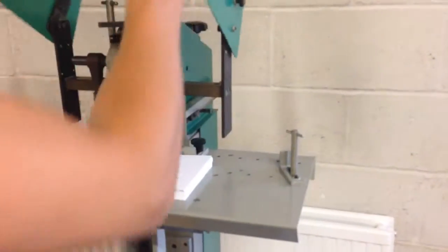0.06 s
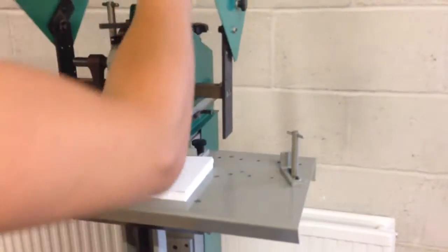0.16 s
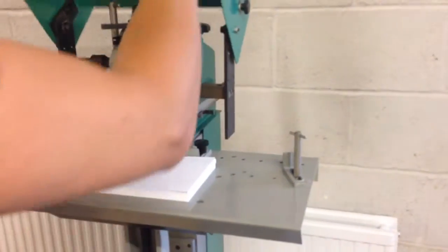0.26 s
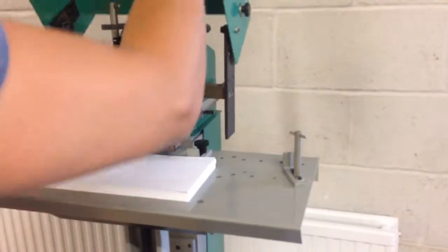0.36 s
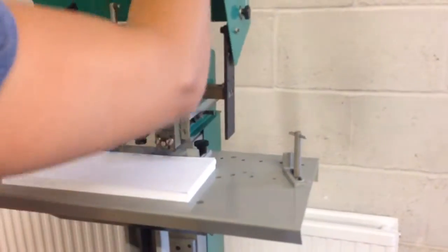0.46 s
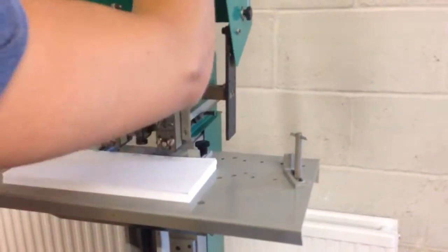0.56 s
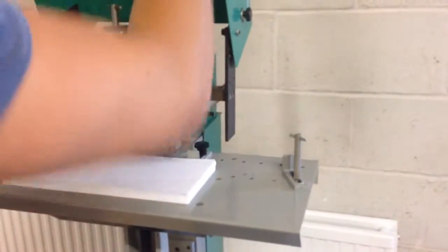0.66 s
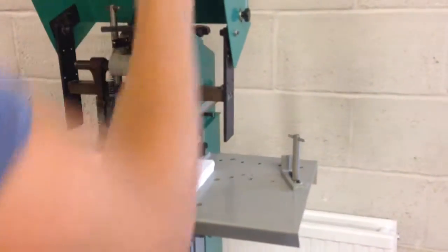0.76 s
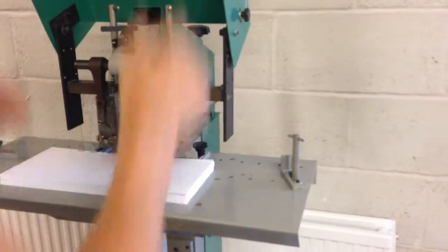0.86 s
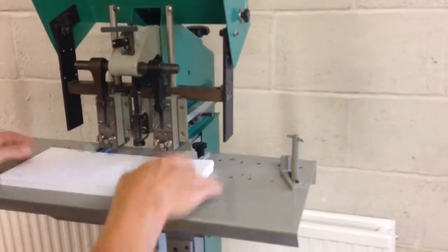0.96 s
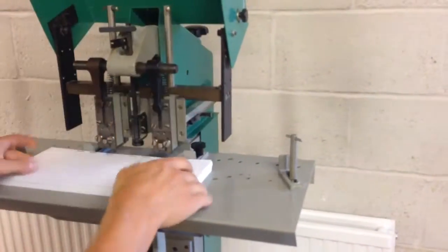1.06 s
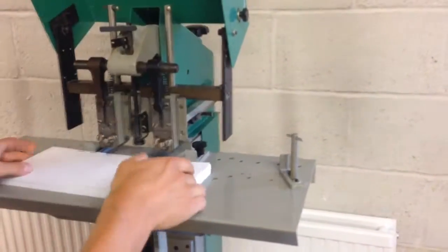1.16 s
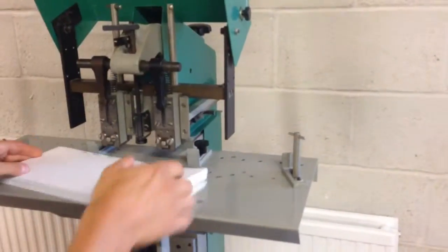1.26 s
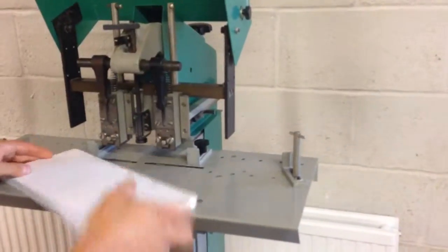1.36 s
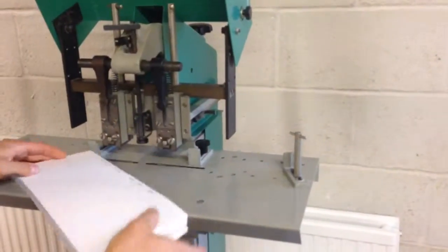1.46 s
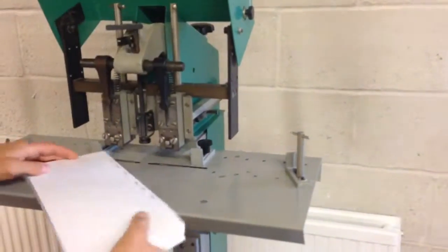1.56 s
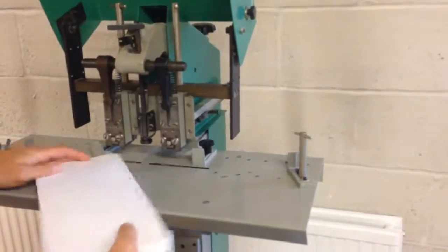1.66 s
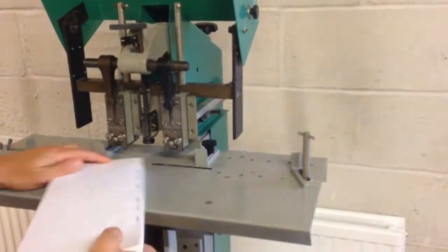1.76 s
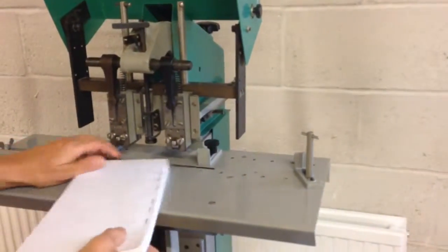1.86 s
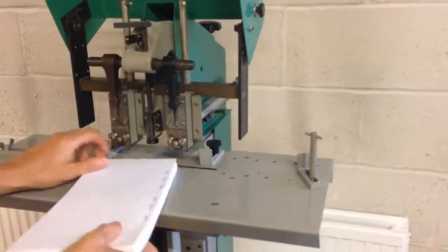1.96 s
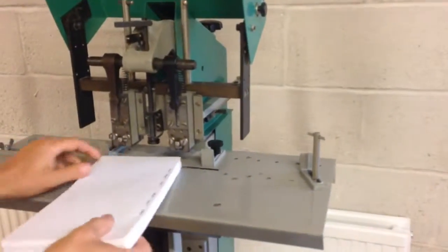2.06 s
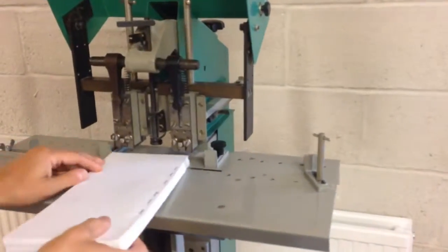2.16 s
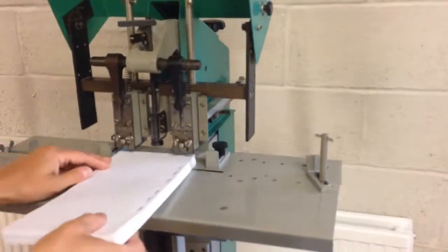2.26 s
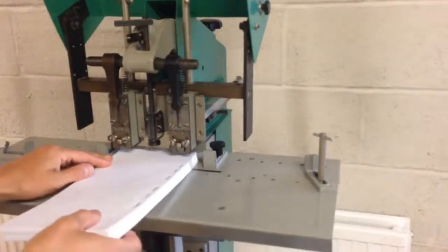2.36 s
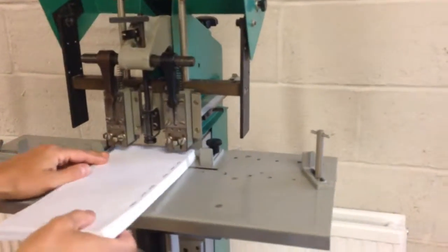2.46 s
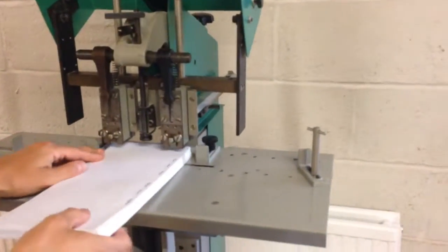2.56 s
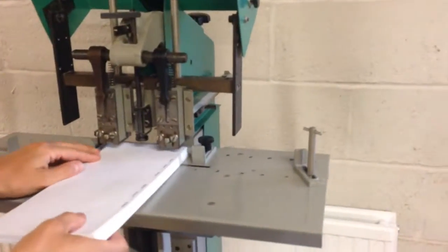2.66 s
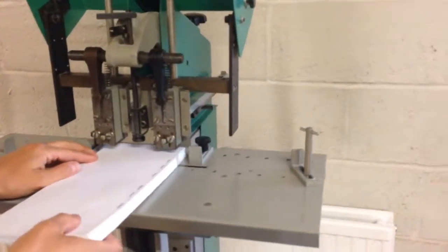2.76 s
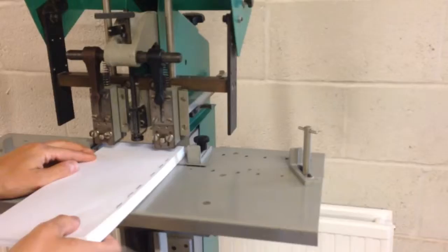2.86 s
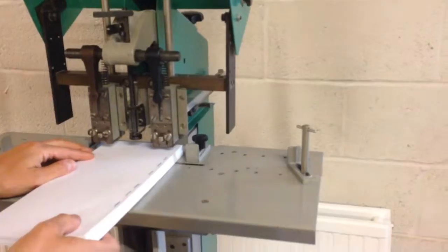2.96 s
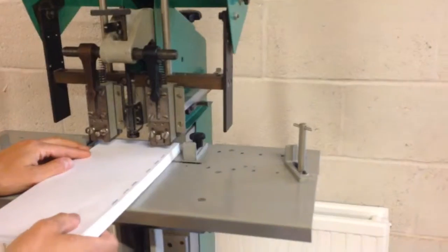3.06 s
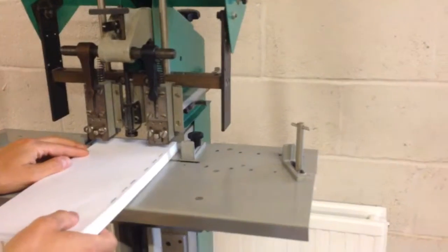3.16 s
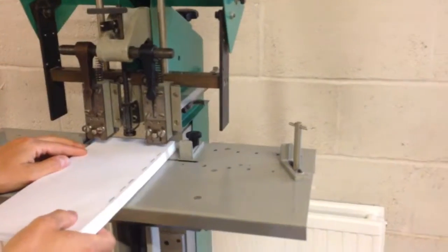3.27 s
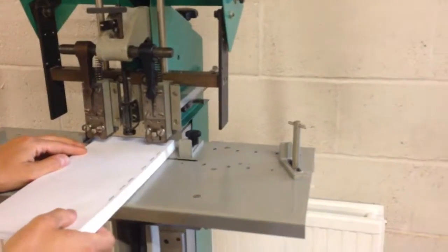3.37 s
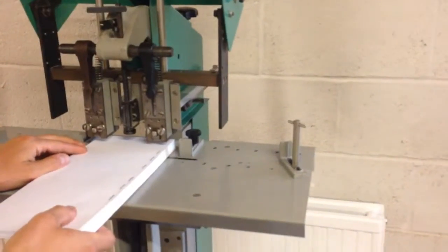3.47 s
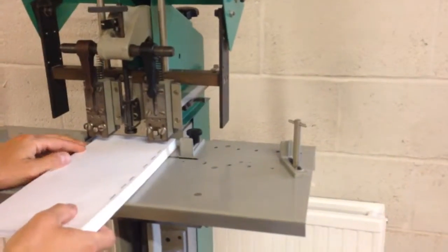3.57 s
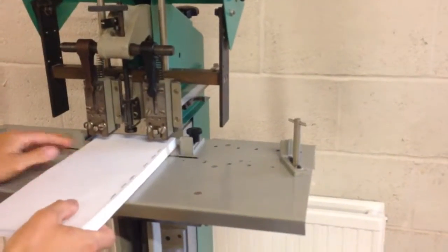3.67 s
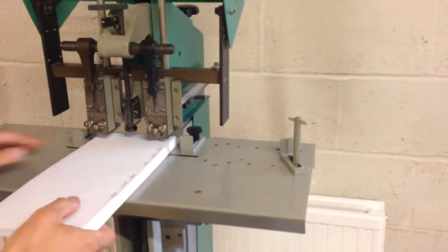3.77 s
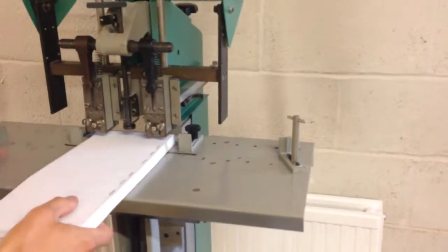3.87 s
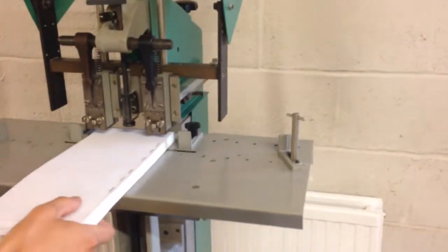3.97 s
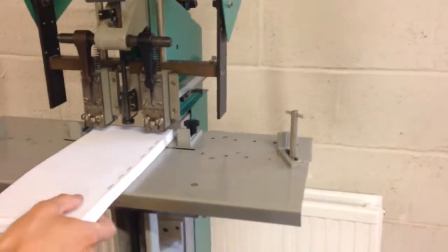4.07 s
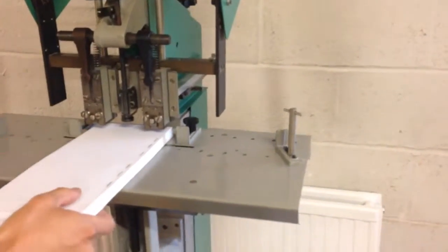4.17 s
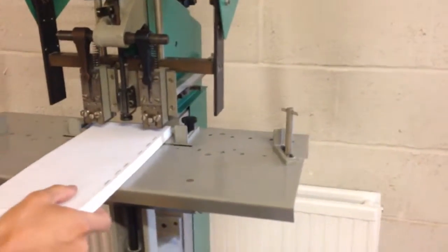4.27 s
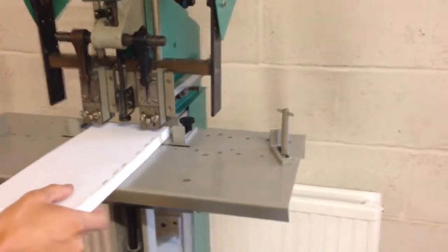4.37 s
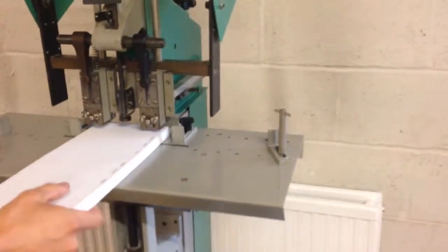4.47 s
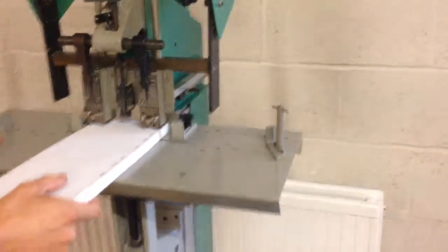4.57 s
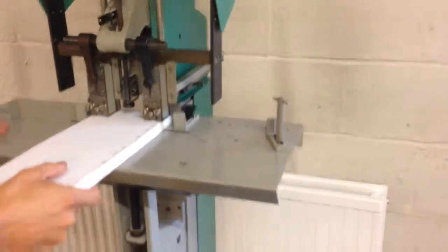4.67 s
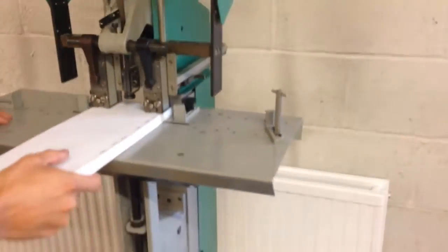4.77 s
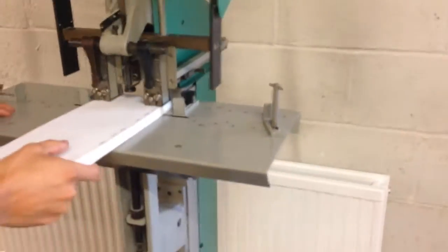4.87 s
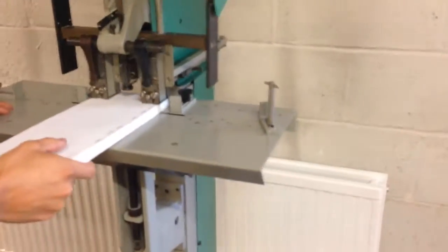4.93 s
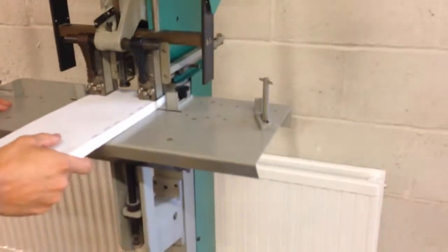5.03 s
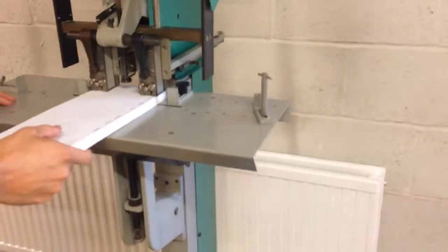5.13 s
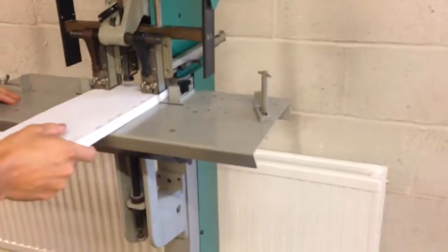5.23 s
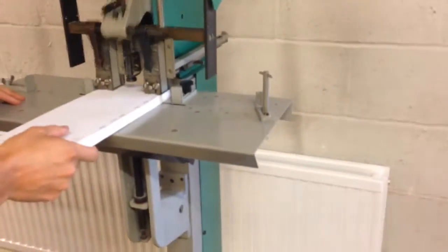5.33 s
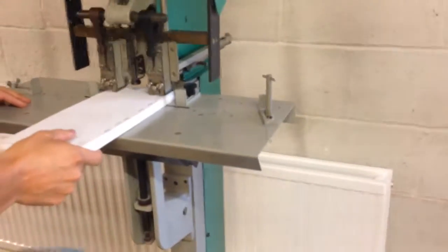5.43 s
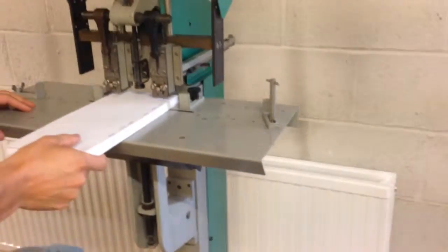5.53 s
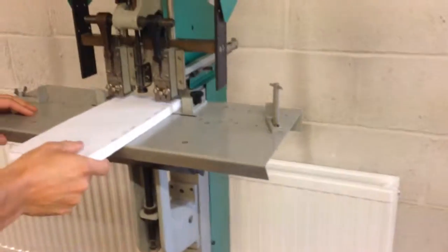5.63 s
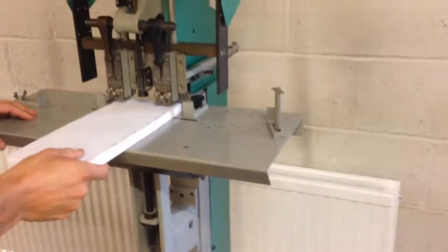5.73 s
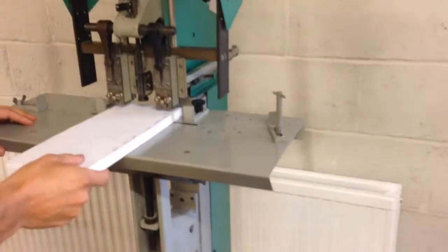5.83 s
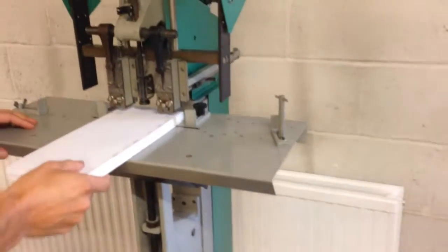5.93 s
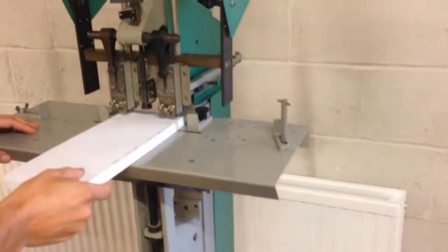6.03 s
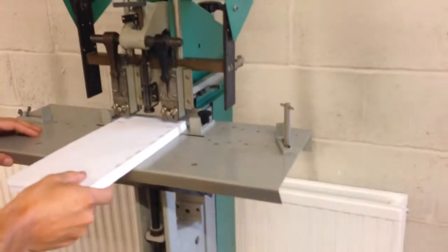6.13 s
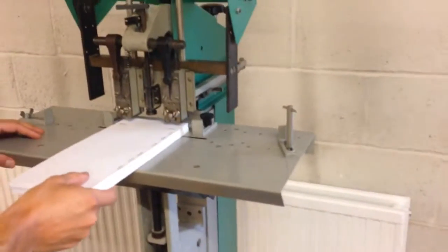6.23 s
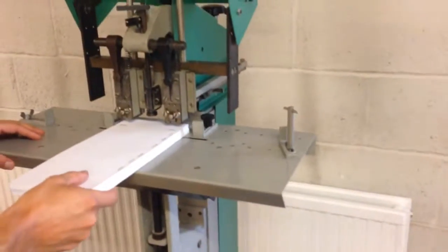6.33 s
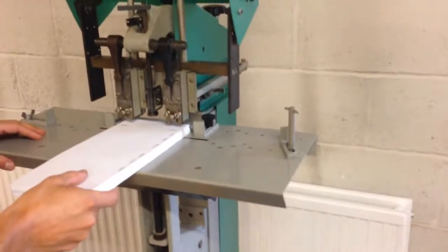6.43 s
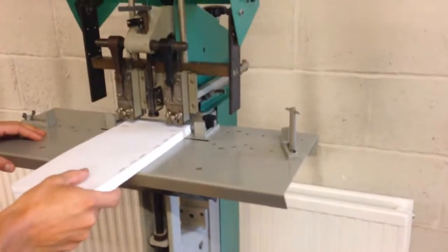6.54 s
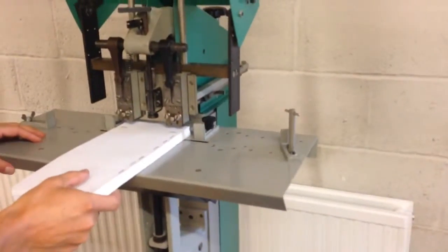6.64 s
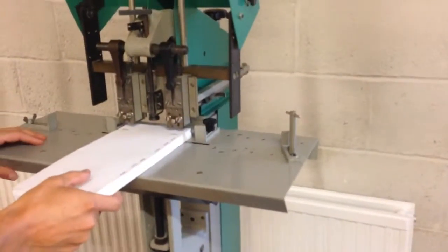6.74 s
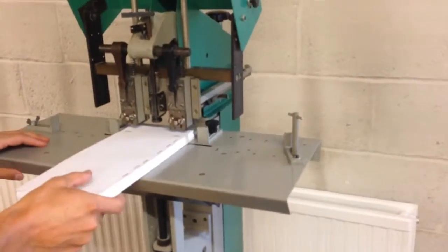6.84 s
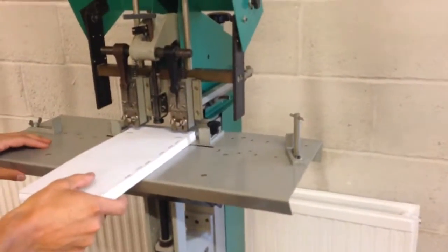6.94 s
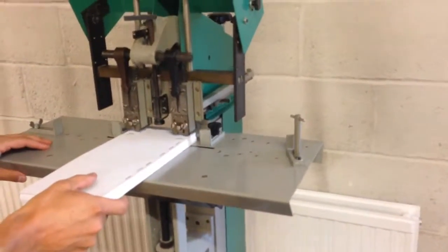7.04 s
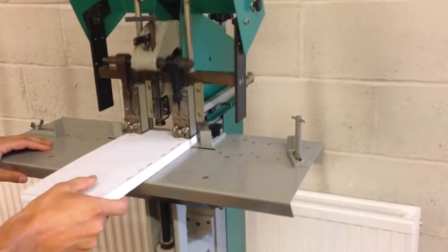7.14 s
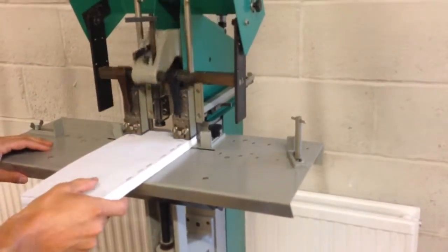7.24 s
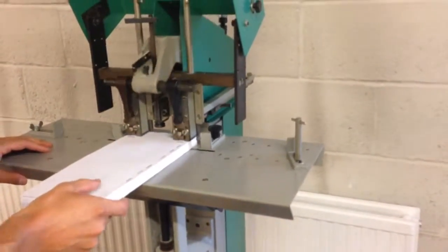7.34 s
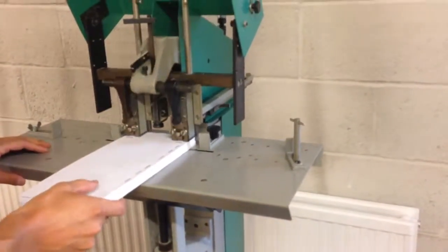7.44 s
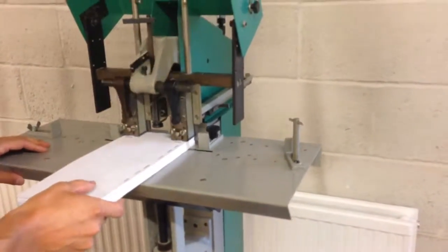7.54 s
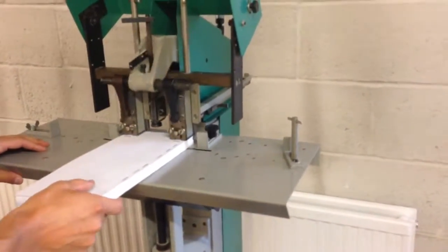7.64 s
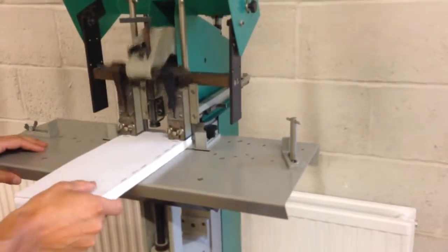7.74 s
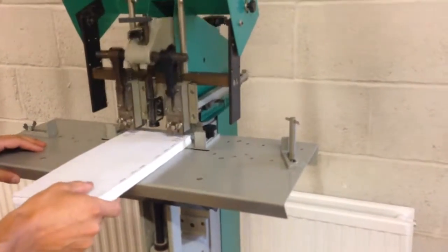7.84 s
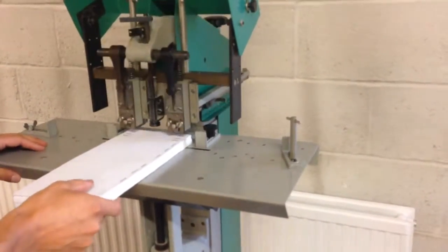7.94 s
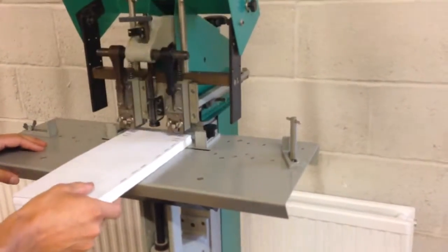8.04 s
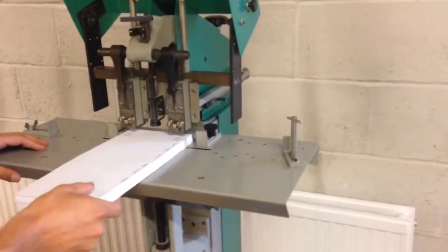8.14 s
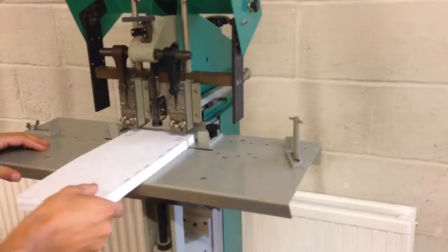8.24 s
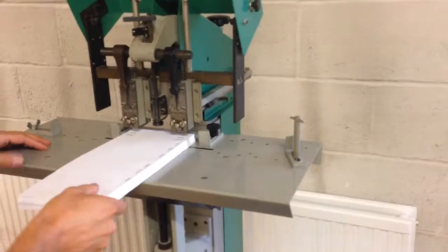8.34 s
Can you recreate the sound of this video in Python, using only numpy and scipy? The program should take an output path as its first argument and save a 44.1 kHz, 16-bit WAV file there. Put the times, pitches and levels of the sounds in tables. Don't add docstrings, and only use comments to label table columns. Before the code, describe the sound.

In a small hard-walled room, a metal guard clicks shut with a low thud. Hands slide and knock a thick paper pad over a steel table, then soft bumps and near quiet. An electric stapling machine bursts into rattling clatter with a heavy boom, returns with a clack, pauses, and repeats. A latch ticks at the end. Close microphone, about a metre away.

```python
import sys
import numpy as np
from scipy import signal
from scipy.fft import rfft, irfft
from scipy.io import wavfile
from scipy.ndimage import uniform_filter1d, map_coordinates

SR = 44100
rng = np.random.default_rng(int(sys.argv[2]) if len(sys.argv) > 2 else 0)


def amplitude_ratio(level_db):
    exponent = np.asarray(level_db, float) / 20
    return 10 ** exponent


def int16_out(signal):
    q = np.round(np.clip(np.atleast_2d(signal).T, -1, 1) * 32767)
    wavfile.write(sys.argv[1], SR, q.astype(np.int16))


N = 370440
TIME = np.arange(N) / SR


def unit(x):
    return x / np.sqrt(np.mean(x ** 2))


def coloured(x, points):
    hz, db = np.transpose(points)
    f = np.fft.rfftfreq(len(x), 1 / SR)
    return irfft(rfft(x) * amplitude_ratio(np.interp(np.log(f + 1), np.log(hz), db)), len(x))


def band(x, lo_hz, hi_hz):
    edges_hz = [lo_hz, min(hi_hz, .45 * SR)]
    return signal.sosfilt(signal.butter(2, edges_hz, "bandpass", fs=SR, output="sos"), x)


def grit(spread_db):
    grains = np.repeat(rng.exponential(size=N // 16 + 1), 16)[:N]
    return unit(rng.standard_normal(N) * amplitude_ratio(spread_db * grains))


def wander(hold, smooth):
    steps = np.repeat(rng.standard_normal(N // hold + 1), hold)
    return uniform_filter1d(steps, smooth)


def swells(times, db, rise_s, fall_s):
    coarse = TIME[::32]
    late = coarse - np.asarray(times)[:, None]
    drop = np.maximum(-late / np.reshape(rise_s, (-1, 1)), late / np.reshape(fall_s, (-1, 1)))
    gain = amplitude_ratio(np.asarray(db)[:, None] - 20 * drop).sum(axis=0)
    return np.interp(TIME, coarse, uniform_filter1d(gain, size=25))


def contacts(times, db, ms, per_energy):
    env = np.zeros(N)
    for s, gain, tau in zip(times, amplitude_ratio(db), np.clip(ms, .3, 60) / 1000):
        start = int((s - 0.81 * tau / 2) * SR)
        t = TIME[:min(int(12 * tau * SR), N - start)] / tau
        shape = (1 - np.exp(-t / 0.61)) ** 3 * np.exp(1.5 - t)
        env[start:start + len(t)] += gain * shape / (np.sqrt(2 * tau * SR) if per_energy else 1)
    return env


def ring(force, modes, damping):
    longest_ring_s = .13
    t = TIME[:SR // 8]
    body = 0
    for hz, db, t60 in modes:
        spread = 1 + .035 * rng.standard_normal((9, 1))
        cluster = np.sin(2 * np.pi * hz * spread * t).T @ rng.standard_normal(9) / np.sqrt(9)
        body = body + amplitude_ratio(db - 60 * damping * t / min(t60, longest_ring_s)) * cluster
    body = body / np.sqrt(np.sum(amplitude_ratio(np.array(modes)[:, 1]) ** 2) / 2)
    return signal.oaconvolve(force, body)[:N]


def sing(table, trim_db):
    blur_hz_s = 10
    out = np.zeros(N)
    chance = rng.standard_normal((len(table), 24))
    for (s, db, hz, t60, ms), draw in zip(table, chance):
        start = int(s * SR)
        t = TIME[:min(int(t60 * SR), N - start)]
        scatter_hz = np.minimum(blur_hz_s / t60, hz / 7) * draw[:12, None]
        phase = (hz + scatter_hz) * t + draw[12:, None]
        partials = np.sin(2 * np.pi * phase).sum(axis=0) / np.sqrt(12)
        swell = 1 - np.exp(-1000 * t / max(ms, .3))
        out[start:start + len(t)] += amplitude_ratio(db + trim_db - 60 * t / t60) * swell * partials
    return out


def thuds(table, panel_hz):
    out = np.zeros(N)
    turns = rng.random((len(table), 4))
    for (s, db, boom_hz, panel_db, ms), turn in zip(table, turns):
        start, tau = int(s * SR), np.clip(ms, 2, 60) / 1000
        t = TIME[:min(int(14 * tau * SR), N - start)]
        boom = np.sin(2 * np.pi * (boom_hz * t + turn[0]))
        boom += 0.25 * np.sin(2 * np.pi * (.81 * boom_hz * t + turn[1]))
        panel = np.sin(2 * np.pi * (panel_hz * (.94 + .12 * turn[3]) * t + turn[2]))
        panel = amplitude_ratio(panel_db - 1.0) * panel * np.exp(-t / .05)
        swing = t / tau * np.exp(1 - t / tau)
        out[start:start + len(t)] += amplitude_ratio(db - 4.5) * swing * (boom + panel)
    return out


# freq_hz, level_db
ROOM_HISS = [(12, -32), (24, -18.5), (163, -12.5), (198, -6), (293, -6), (340, -14.5), (2530, -21.5),
             (15500, -27)]
# time_s, level_db
FLOOR_DRONE = [(0, -57), (1.2, -59.5), (2.1, -63.5), (3.0, -69), (6.0, -69), (8.4, -70)]


def room_tone():
    s, _, _, load_db = np.transpose(LOADS)
    gain = amplitude_ratio(np.interp(TIME, *np.transpose(FLOOR_DRONE))) + swells(s, load_db, .06, .15)
    drone = unit(band(rng.standard_normal(N), 38, 160)) * gain * amplitude_ratio(-8.5)
    return unit(coloured(rng.standard_normal(N), ROOM_HISS)) * amplitude_ratio(-72) + drone


# freq_hz, t60_s
WALL_DECAY = [(100, 0.2), (260, 0.37), (700, 0.41), (1840, 0.38), (4850, 0.37), (12800, 0.25)]


def room():
    t = TIME[:SR]
    hz, t60 = np.transpose(WALL_DECAY)
    tail = 0
    for centre in 90 * 2. ** np.arange(8):
        fall_db = -60 * t / np.interp(np.log(centre), np.log(hz), t60)
        next_door_db = -23.5 - 0.9 * np.log2(centre / 90) + 0.32 * fall_db
        decay = amplitude_ratio(fall_db) + amplitude_ratio(next_door_db)
        octave = band(rng.standard_normal(SR), centre / np.sqrt(2), centre * np.sqrt(2))
        tail = tail + octave * decay / np.sqrt(np.sum(decay ** 2))
    tail = tail * np.clip((t - .003) / 0.0027, 0, 1)
    tones = rfft(tail)
    excess = (np.abs(tones) + 1e-9) / uniform_filter1d(np.abs(tones), size=60)
    tail = irfft(tones / np.maximum(excess, 1) ** .85, SR) * np.clip(1.25 - t / .56, 0, 1)
    return unit(tail) / np.sqrt(SR)


def echoes(send):
    sway_ms, hold = .07, SR // 40
    sway = uniform_filter1d(wander(hold, hold), hold)[:N]
    echo = signal.fftconvolve(send, room())[:N]
    return map_coordinates(echo, [np.arange(N) + sway_ms * SR / 1000 * sway], mode="mirror")


# freq_hz, level_db, t60_s
GUARD_MODES = [(455.4, 7, 0.23), (700, -2, .12), (806, -1.5, 0.1), (1040, 4, 0.23), (1214, 2, 0.079),
               (1493, -12.5, 0.092), (1700, -10, 0.065), (1712, 2, 0.134), (2330, 1, 0.035),
               (2226, -6.5, 0.3), (2760, -30, 0.071)]
# start_s, clack_db, then re clack parts_db and table_db, contact_ms
GUARD_TAPS = [
    (0.5052, -26, -9.5, -4.5, 4.8),
    (0.52, -42, -23, -0.5, 3.4),
    (0.5324, -49, -20, -5, 1),
]


def guard_click():
    return hits(GUARD_TAPS, -11, GUARD_MODES, 1.4)


# peak_s, rub_db, hiss_db, rise_s and fall_s per
# 20 dB
SLIDES = [(1.17, -55, -75, .04, 0.33), (1.36, -53, -68, .16, .2), (1.546, -57, -56.5, 0.06, 0.05),
          (1.69, -64, -70, .1, 0.17), (1.745, -75, -50.5, 0.04, 0.09), (1.83, -51, -78, .2, 0.1),
          (3.928, -68.5, -60.5, .04, 0.14), (4.196, -76, -62.5, 0.25, 0.2), (4.468, -70.5, -54.5, .06, .04),
          (6.58, -78, -67.5, .11, .12), (6.79, -66.5, -62.5, 0.2, .11), (8.12, -75, -58, .1, .3),
          (5.72, -78, -61, .1, .2), (1.39, -62, -63, .03, .1), (1.8, -57, -66, .05, .08)]
# freq_hz, level_db
PAPER_HISS = [(1180, -30), (2000, -6), (5390, -7), (6420, -12), (14000, -17), (15600, -35.5), (16000, -50)]


def slides():
    rub = unit(ring(grit(1.0), GUARD_MODES + FRAME_MODES[2:], 14.0))
    rub = rub + 0.6 * unit(band(grit(3.7), 300, 3400))
    hiss = unit(coloured(grit(1.2), PAPER_HISS))
    hold = int(.02 * SR)
    catch = np.repeat(rng.standard_normal(N // hold + 1), hold)[:N]
    rub = unit(rub * amplitude_ratio(5 * uniform_filter1d(catch, size=300)))
    s, rub_db, hiss_db, rise_s, fall_s = np.transpose(SLIDES)
    rub = rub * swells(s, rub_db, rise_s, fall_s) * amplitude_ratio(-8.5)
    return rub + hiss * swells(s, hiss_db, rise_s, fall_s) * amplitude_ratio(-9)


# start_s, knock_db, knock_hz, tick_db re knock, contact_ms
KNOCKS = [(1.15, -49, 1060, -16, 2.5), (1.249, -61, 939, -20, 4), (1.372, -56.5, 1840, -6, 6),
          (1.462, -56, 1010, -12, 4.8), (1.536, -48, 2400, -6, 5), (1.566, -35, 1390, -24, 1.6),
          (1.631, -37, 1560, -26, 2), (1.677, -43, 920, -19, 1.9), (1.746, -44.5, 1200, -10, 7),
          (2.145, -51.5, 800, -22, 6), (2.476, -52, 800, -27, 7), (3.173, -55, 900, -28, 7),
          (3.92, -64, 1770, 0, 2.4), (6.42, -64, 1077, -9.5, 3), (6.646, -56, 1420, -14, 1.5)]


def knocks():
    s, db, knock_hz, tick_db, ms = np.transpose(KNOCKS)
    slap_db = db - 6
    noise, out = grit(1.7), np.zeros(N)
    for when, gain_db, hz, length in zip(s, db, knock_hz, ms):
        span = slice(int(when * SR) - 999, int(when * SR) + 5000)
        press = contacts([when], np.array([gain_db - 14.5]), [1.46 * length], False)
        out[span] += unit(band(noise[span], hz / 1.11, hz * 1.11)) * press[span]
    slap = unit(band(grit(1.2), 284, 1970)) * contacts(s, slap_db - 4.5, 1.9 * ms, False)
    table = ring(grit(0.9) * contacts(s, slap_db - 7.5, ms, True), GUARD_MODES, 2.2)
    tick = unit(band(grit(1.5), 2800, 6300)) * contacts(s, db + tick_db - 7.0, ms, False)
    soft = signal.butter(3, 2800, fs=SR, output="sos")
    return signal.sosfilt(soft, out + slap + table) + tick


# start_s, level_db, pitch_hz, t60_s, swell_ms
PAD_NOTES = [(1.151, -54, 1050, .16, 2), (1.155, -56, 1900, .12, 4), (1.32, -58, 2550, .1, 10),
             (1.4, -57, 2350, .12, 12), (1.464, -54, 650, .1, 5), (1.536, -47, 2480, .09, 4),
             (1.537, -50, 1150, .07, 3), (1.566, -46, 1500, .06, 3), (1.567, -48, 570, .07, 3),
             (1.63, -40, 1560, .08, 3), (1.63, -44, 1200, .08, 3), (1.632, -45, 480, .12, 4),
             (1.678, -45, 940, .07, 3), (1.712, -53, 1490, .05, 3), (1.745, -49, 5500, .07, 6),
             (1.745, -49, 4200, .07, 6), (1.79, -54, 1900, .1, 8), (1.835, -53, 1000, .08, 6),
             (2.146, -60, 1010, .22, 4), (2.15, -56, 380, .2, 10), (2.15, -62, 1750, .1, 6),
             (2.477, -60, 1010, .22, 4), (2.48, -56, 400, .2, 8), (3.173, -63, 1000, .16, 4),
             (3.175, -59, 400, .2, 6), (6.646, -58, 1400, .06, 1)]


def pad_notes():
    return sing(PAD_NOTES, -1)


# start_s, boom_db, boom_hz, panel_db re boom, swell_ms
BUMPS = [(0.016, -51, 221, -2.5, 6), (1.154, -55.5, 135.6, 6.5, 20), (1.46, -55, 178, 0, 16),
         (1.63, -46.5, 175, 2, 4.8), (1.708, -46.5, 180, -16, 10.4), (1.828, -50.5, 152, 0, 7),
         (2.161, -55, 226, 1, 10.6), (2.492, -56.5, 157, 3, 9), (3.173, -63, 240, 6, 7.6),
         (3.323, -58, 130, -29, 7.4), (6.416, -55.5, 222.5, -5.5, 7.1), (6.646, -51.5, 194, -6.5, 3.5),
         (8.213, -52, 259, 5, 8), (1.76, -48, 170, -14, 9)]


def bumps():
    return thuds(BUMPS, 377.3)


# start_s, boom_db, boom_hz, bracket_db re boom, swell_ms
JOLTS = [
    (0.521, -36, 177, -6, 11),
    (0.575, -44, 170, -12, 14),
    (0.52, -40.5, 288, -20, 14),
    (1.569, -60, 264, 6, 5.2),
    (5.9435, -52, 213, 13, 3),
    (8.33, -40.5, 210, 2, 3.7),
]


def jolts():
    return thuds(JOLTS, 491)


# start_s, clack_db, then re clack table_db, sizzle_db, rattle_db
SNAPS = [
    (5.3372, -27, -20, -3, -13),
    (5.9442, -38, 0, -20, -8),
    (7.2735, -36, -2, -1, -9),
    (7.0548, -36, -8, -14, -6),
    (7.7112, -25, -22, -2, -12),
    (8.332, -39, -4, -24, -6),
]


def snaps():
    s, clack_db, plate_db, sizzle_db, rattle_db = np.transpose(SNAPS)
    layers = ((clack_db - 6, 2500, 6600),
              (clack_db + sizzle_db - 1.5, 5600, 14500),
              (clack_db + plate_db - 3.5, 450, 2400))
    out = 0
    for db, lo_hz, hi_hz in layers:
        noise = unit(band(band(rng.standard_normal(N), lo_hz, hi_hz), lo_hz, hi_hz))
        tick = contacts(s, db, 0.7 + 0 * s, False)
        spring = contacts(s + 0.0012, db + rattle_db - lo_hz / 800, 6.0 + 0 * s, False)
        out = out + noise * (tick + spring)
    return out


# start_s, level_db, pitch_hz, t60_s, swell_ms
CHINKS = [(5.934, -55, 2700, .05, 6), (5.944, -40, 2700, .05, 1), (5.972, -50, 5600, .04, 2),
          (5.972, -47, 1350, .08, 3), (8.332, -38, 2550, .06, 1), (8.334, -43, 4300, .05, 2),
          (8.334, -43, 3350, .08, 2), (8.358, -50, 3000, .06, 4), (0.498, -52, 3000, .04, 3),
          (0.506, -33, 800, .08, 2), (0.512, -37, 1730, .3, 4), (0.514, -35, 2850, .06, 4),
          (5.3365, -22, 6700, .018, .4), (5.361, -40, 3900, .04, 1), (5.39, -40, 1400, .1, 6),
          (4.918, -29, 520, .16, 6), (5.475, -35, 3000, .07, 6), (7.7108, -22, 5600, .018, .4),
          (7.73, -38, 2000, .08, 5), (5.47, -32, 850, .15, 5), (4.624, -35, 9200, .04, 2),
          (4.692, -31, 6000, .04, 1), (4.786, -39, 4200, .16, 6), (4.978, -37, 6200, .04, 2),
          (7.77, -46, 3900, .12, 10), (7.215, -33, 6200, .05, 3), (7.266, -41, 4000, .06, 5),
          (7.39, -28, 560, .16, 6), (7.366, -27, 3790, .05, 2), (5.945, -47, 560, .2, 3),
          (7.85, -33, 6200, .08, 3)]


def chinks():
    return sing(CHINKS, -1.5)


# freq_hz, level_db, t60_s
FRAME_MODES = [(156, -11.5, 0.22), (194, -6.5, 0.11), (226, -3.5, 0.78), (381, -12, 0.45),
               (472, -9.5, 0.75)]
# start_s, stop_s, shake_db, rattle_db
RUNS = [
    (4.56, 5.6, -48, -56.5),
    (5.7, 6.2, -62, -80),
    (7.08, 7.952, -45, -49),
]
# peak_s, shake_db, rattle_db, drone_db
LOADS = [(4.67, -27.5, -53, -47), (4.8, -38, -47, -58), (4.922, -15, -40, -39), (5.0, -50, -42, -54.5),
         (5.39, -41, -34.5, -50), (5.526, -34.5, -43.5, -49), (7.226, -25, -60, -43),
         (7.326, -36.5, -35.5, -48), (7.39, -21, -57, -34), (7.492, -45, -36.5, -55), (7.75, -40, -33, -54),
         (7.922, -30, -37, -54), (8.28, -57, -59, -66)]


def drive():
    s, shake_db, rattle_db, _ = np.transpose(LOADS)
    shake_gain = swells(s, shake_db, .06, .06)
    rattle_gain = swells(s, rattle_db, .07, .09)
    for start, stop, run_shake_db, run_rattle_db in RUNS:
        outside = np.maximum((start - TIME) / .06, (TIME - stop) / 0.21)
        turning = amplitude_ratio(-20 * np.maximum(outside, 0))
        shake_gain = shake_gain + amplitude_ratio(run_shake_db) * turning
        rattle_gain = rattle_gain + amplitude_ratio(run_rattle_db) * turning
    shake = unit(ring(grit(0.6), FRAME_MODES, 2.8)) * shake_gain * amplitude_ratio(-11.5)
    grains = grit(1.5)
    rattle = .6 * unit(ring(grains, TABLE_MODES, 4.0))
    rattle = rattle + unit(band(band(grains, 700, 2700), 700, 2700))
    rattle = rattle + .2 * unit(band(grains, 2800, 7000))
    return shake + rattle * rattle_gain * amplitude_ratio(-11.5)


# start_s, boom_db, boom_hz, panel_db re boom, swell_ms
DOWN_SHOVES = [(4.493, -41, 183, -3, 4.9), (4.549, -36.5, 170, -7, 6.2), (4.63, -42, 184, 2, 10),
               (4.696, -21, 194, -1.5, 4), (4.72, -27.5, 171, -1, 9.9), (4.79, -23.5, 165, -7, 5.5),
               (4.86, -36, 139, 7, 17), (4.912, -16.5, 145.8, -9, 4), (7.039, -38.5, 251, -17, 11),
               (7.075, -32, 194, -7.5, 8.8), (7.18, -30.5, 156, -2, 7.5), (7.209, -28.5, 245, 2.5, 4.3),
               (7.257, -26.5, 172, -25, 7.2), (7.311, -22, 157, -15, 4.1), (7.369, -21, 230, -4, 11)]
# start_s, boom_db
STROKES = [
    (4.929, -7.5),
    (7.39, -7),
]
# delay_s, level_db re stroke, boom_hz, panel_db re boom, swell_ms
ROCKING = [
    (0, -1.5, 187.6, -4.5, 6.2),
    (.0245, -5.5, 164.7, -10, 9.5),
    (.055, -14.5, 153, -6, 4.3),
]
# start_s, boom_db, boom_hz, panel_db re boom, swell_ms
UP_SHOVES = [(5.307, -37.5, 245, -9.5, 5.2), (5.343, -33, 171, -2.5, 28), (5.375, -31, 239, 1.5, 6.1),
             (5.469, -22, 194, 4, 7.6), (5.529, -29, 236, -14, 6.5), (7.667, -35, 157, -6, 9),
             (7.694, -35.5, 194, -4.5, 33), (7.734, -32.5, 264, 6.5, 13.6), (7.771, -31, 242, 3.5, 6.4),
             (7.843, -15.5, 195, -2.5, 5.9), (7.899, -33, 246, 3, 10.4), (7.968, -29, 223, -6, 4.6)]


def stand_booms():
    rocks = [(s + delay, db + rel_db, *rest) for s, db in STROKES for delay, rel_db, *rest in ROCKING]
    return thuds(DOWN_SHOVES + rocks + UP_SHOVES, 377.3)


# start_s, level_db, pitch_hz, t60_s, swell_ms
RINGS = [(4.621, -30, 3480, .2, 5), (4.622, -31, 6370, .06, 3), (4.622, -36, 2420, .06, 3),
         (4.69, -30, 3580, .14, 2), (4.797, -33, 3560, .17, 8), (4.914, -22, 1960, .1, 4),
         (4.92, -26, 6600, .06, 4), (5.35, -38, 1900, .15, 12), (7.038, -47, 1250, .06, 6),
         (7.056, -43, 1320, .16, 5), (7.056, -44, 3200, .1, 3), (7.088, -43, 3150, .08, 4),
         (7.15, -32, 4480, .09, 4), (7.15, -33, 7400, .07, 3), (7.17, -35, 1600, .15, 8),
         (7.206, -33, 4590, .07, 4), (7.842, -24, 1060, .2, 5), (8.0, -56, 5690, .45, 60),
         (7.95, -50, 4300, .4, 30), (5.47, -56, 5700, .6, 15), (8.205, -52, 1100, .15, 10),
         (8.21, -47, 520, .25, 15), (4.542, -52, 3420, .1, 4), (4.95, -28, 1400, .16, 10),
         (4.925, -27, 4200, .08, 3), (5.0, -38, 1950, .15, 8), (5.385, -39, 2300, .1, 6),
         (5.468, -27, 1300, .12, 4), (5.47, -30, 4200, .07, 3), (7.385, -21.5, 1060, .16, 5),
         (7.39, -25, 1480, .12, 5), (7.39, -22, 380, .2, 10), (7.388, -27, 4300, .08, 3),
         (7.43, -33, 6000, .06, 4), (7.47, -35, 4000, .08, 5), (7.745, -37, 1100, .12, 8),
         (7.4, -18, 155, .22, 14)]


def part_rings():
    return sing(RINGS, -1.5)


# freq_hz, level_db
CLACK = [(1180, -25.5), (2000, -1), (2740, -10.5), (5250, -7.5), (6590, -2.5), (12000, -17.5),
         (15200, -20.5), (16000, -62.5)]
# freq_hz, level_db, t60_s
PART_MODES = [(2602, -10, 0.037), (3620, -9, .05), (4317, -9, .05), (5350, -16, 0.041), (6300, -11, .02),
              (7890, -13, 0.029)]


def hits(table, sizzle_db, plate, plate_damping):
    s, clack_db, parts_db, plate_db, ms = np.transpose(table)
    plate_db = clack_db + plate_db
    chatter = coloured(grit(0.5), CLACK)
    clack = unit(band(chatter, 2200, 5540)) * contacts(s, clack_db - 12.0, ms, False)
    sizzle = unit(band(chatter, 7900, 19000)) * contacts(s, clack_db + sizzle_db - 5, ms, False)
    parts = ring(grit(0.5) * contacts(s, clack_db + parts_db - 4, ms, True), PART_MODES, 3.5)
    broad = unit(band(grit(0.59), 310, 1900)) * contacts(s, plate_db - 7.5, 1.92 * ms, False)
    sheet = ring(grit(1.3) * contacts(s, plate_db - 4, 1.31 * ms, True), plate, plate_damping)
    return clack + sizzle + parts + broad + sheet


# freq_hz, level_db, t60_s
TABLE_MODES = [(645, 1.5, 0.14), (699, -19.5, 0.4), (820, -28, 0.11), (827, -14, 0.09), (1053, -5.5, 0.24),
               (1090, 1.5, 0.071), (1164, -10.5, 0.25), (1193, -18, 2.1), (1460, -7.5, 2.8),
               (1646, -28, 0.4), (1880, -21.5, 0.99), (2030, -27.5, 0.7), (2070, -17, 0.72),
               (2420, -26, 0.64)]
# start_s, clack_db, then re clack parts_db and table_db, contact_ms
BLOWS = [(4.5404, -44.5, 1, -3, 2), (4.6209, -19, -5, -13.5, 8.5), (4.6896, -17.5, -11, -14, 2.8),
         (4.7764, -24, -9, -5, 3), (4.9032, -15, -9, -2.5, 7), (4.9228, -11, -14.5, -18.5, 2.8),
         (4.9136, -18, -10, -10, 2.5), (4.929, -18, -8, -14, 2), (4.7844, -27, -6, -10, 5),
         (4.794, -32, -6, -10, 3), (7.273, -28, -6, -6, 5), (7.3708, -22, -8, -8, 3),
         (7.212, -26, -5, -8, 4), (5.363, -37, -8, -4, 2), (7.432, -24, -6, -10, 3),
         (5.459, -29.5, -14, -1, 2.6), (5.4648, -14.5, -14, -10, 5.1), (7.1486, -21, -13, -14, 10.5),
         (7.203, -19, -16, -11.5, 3.5), (7.363, -17, -2, 1, 8), (7.3834, -11, -9, -13.5, 6.5),
         (7.6935, -30.5, -17, -12, 3.9), (7.8315, -24.5, -22, -5, 8.8), (7.8389, -12.5, -14, -8, 3.9)]
# start_s, clack_db, table_db re clack, contact_ms
NUDGES = [(4.5161, -52, -2, 9), (4.7194, -39, 10, 3), (5.2924, -51, 2.5, 12), (5.3574, -46, 7, 9),
          (5.3911, -49, 4, 5), (7.06, -40, -4, 8.9), (7.677, -39, 5, 1.6), (7.7332, -42, 9, 8.8),
          (7.7694, -51, 6, 3.4), (7.9794, -41, -6, 20), (8.206, -62, 8.5, 12)]


def stitching():
    nudges = [(s, db, -16, table_db, ms) for s, db, table_db, ms in NUDGES]
    sizzle_db = np.array([-11.5] * len(BLOWS) + [-17.5] * len(nudges))
    return hits(BLOWS + nudges, sizzle_db, TABLE_MODES, 1.6)


def scene():
    paper = knocks() + slides()
    pad, small, notes = pad_notes(), chinks(), part_rings()
    latches = snaps()
    booms = bumps() + jolts() + stand_booms()
    steel = guard_click() + drive() + stitching()
    dull_latches = band(band(latches, 300, 7500), 300, 7500)
    send = amplitude_ratio(-1.5) * steel + amplitude_ratio(-4.0) * dull_latches + amplitude_ratio(-5) * booms + amplitude_ratio(-3.5) * paper
    send = send + amplitude_ratio(-11) * notes + amplitude_ratio(-13) * pad + amplitude_ratio(-10) * small
    heard = small + notes + pad + steel + latches + booms + paper + echoes(send)
    no_bass = signal.butter(4, 130, "highpass", fs=SR, output="sos")
    return (signal.sosfilt(no_bass, heard) + room_tone())[None]


def top_cut(x):
    return signal.sosfilt(signal.butter(12, 16470, fs=SR, output="sos"), x)


def record(dry):
    soft = np.tanh(1.643 * dry) / 0.79
    mix = signal.sosfilt(signal.ellip(6, .2, 30, 15300, fs=SR, output="sos"), soft)
    return top_cut(mix)


dry = scene()
out = record(dry)
int16_out(out)
```